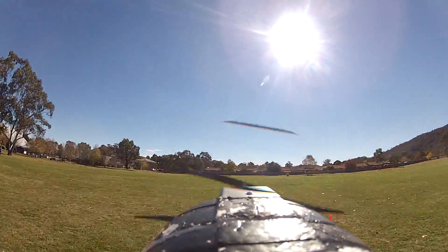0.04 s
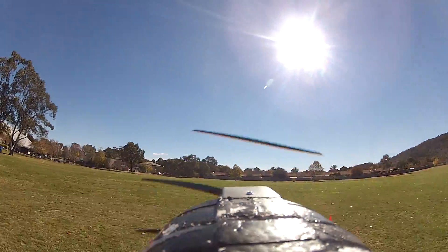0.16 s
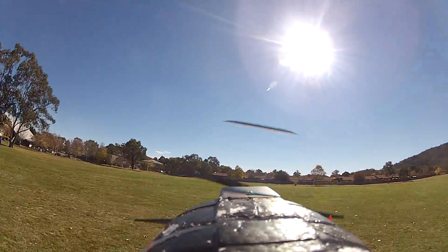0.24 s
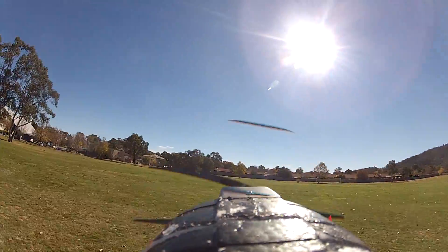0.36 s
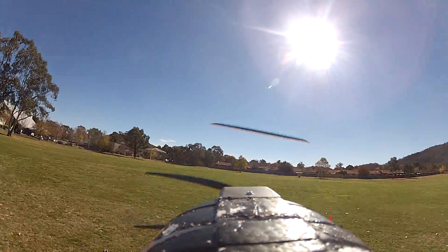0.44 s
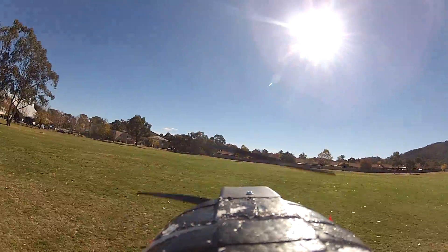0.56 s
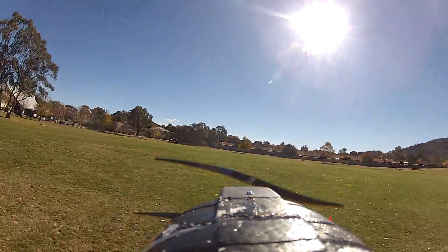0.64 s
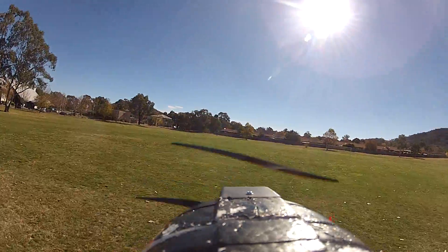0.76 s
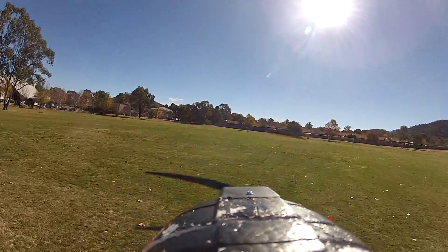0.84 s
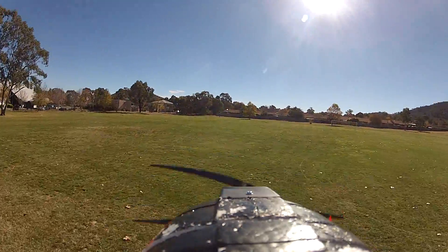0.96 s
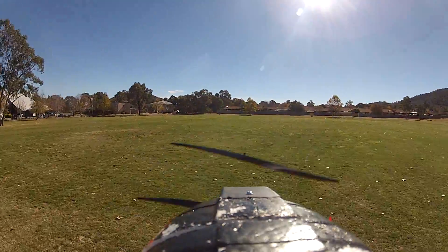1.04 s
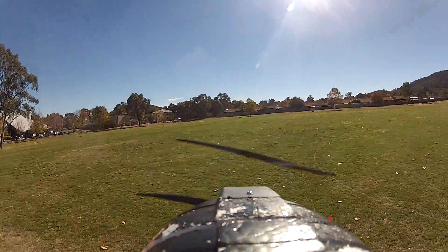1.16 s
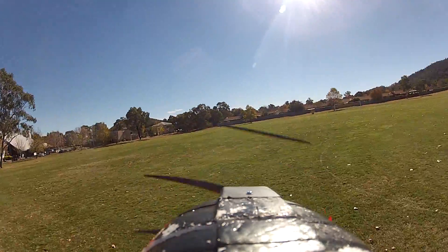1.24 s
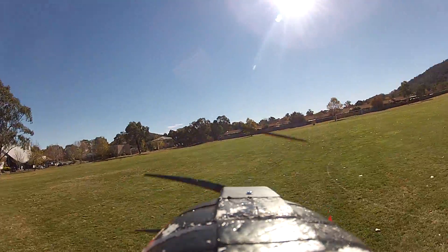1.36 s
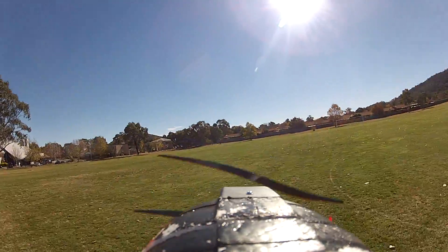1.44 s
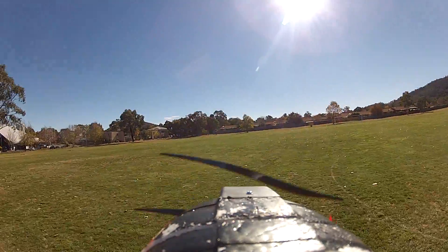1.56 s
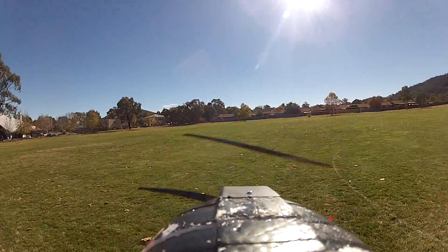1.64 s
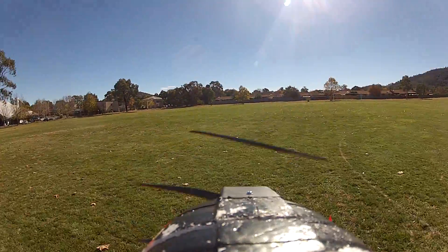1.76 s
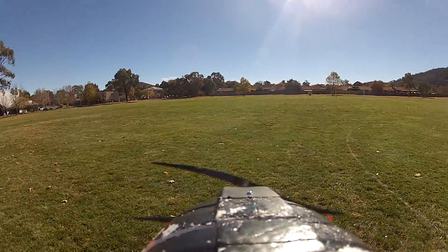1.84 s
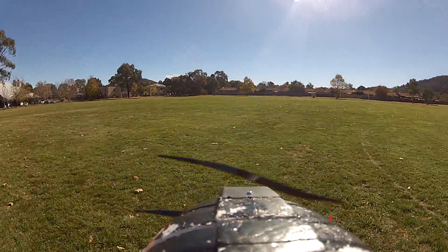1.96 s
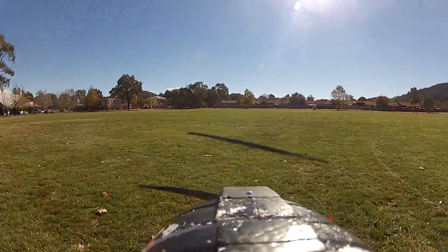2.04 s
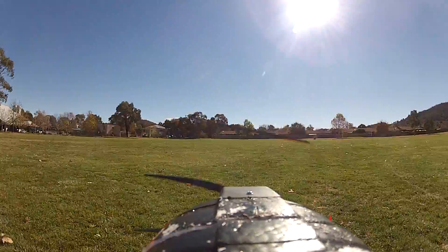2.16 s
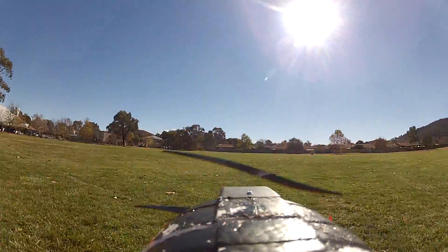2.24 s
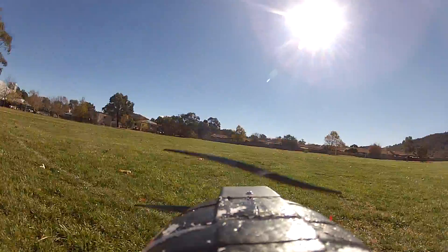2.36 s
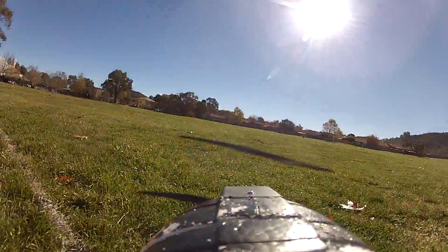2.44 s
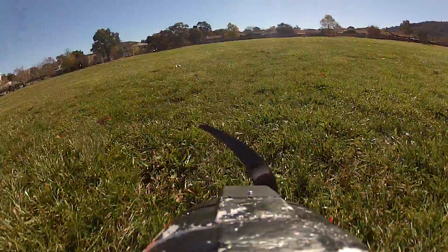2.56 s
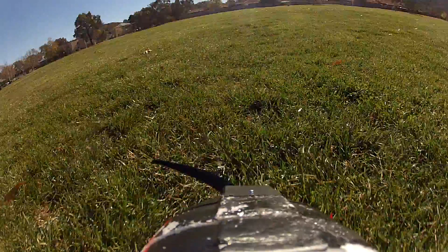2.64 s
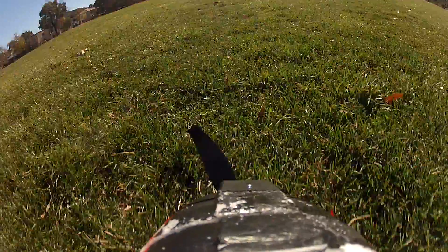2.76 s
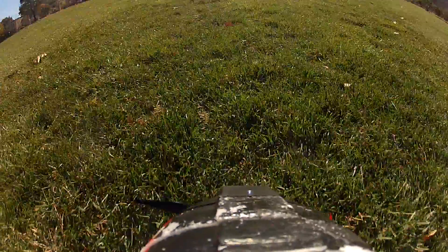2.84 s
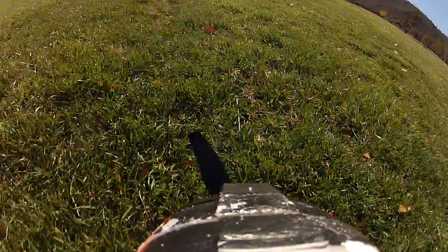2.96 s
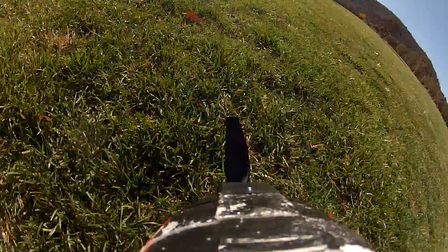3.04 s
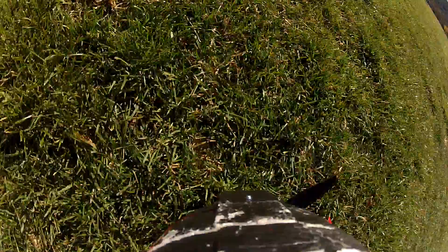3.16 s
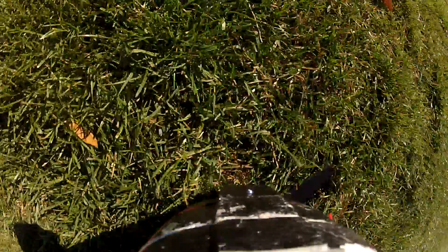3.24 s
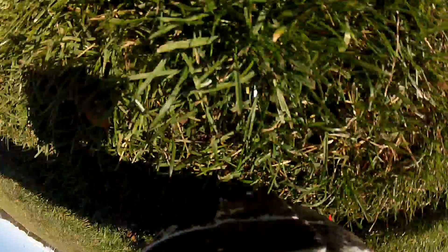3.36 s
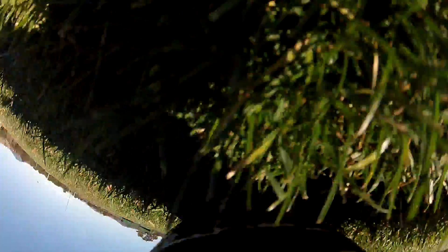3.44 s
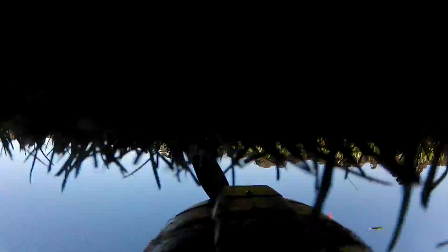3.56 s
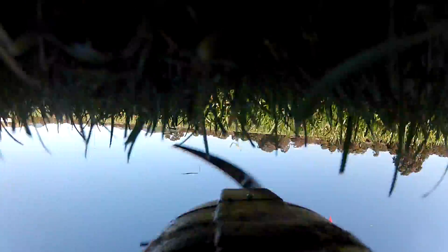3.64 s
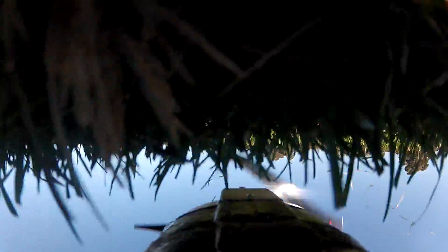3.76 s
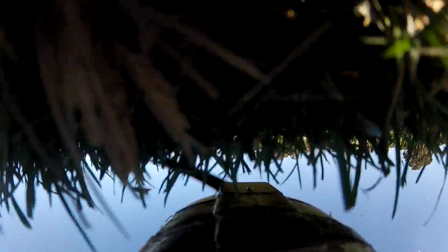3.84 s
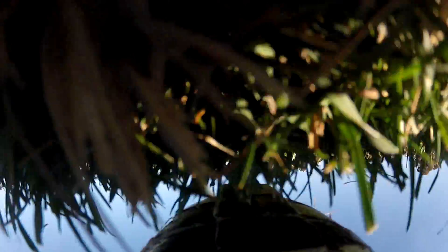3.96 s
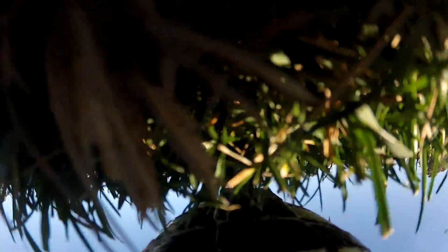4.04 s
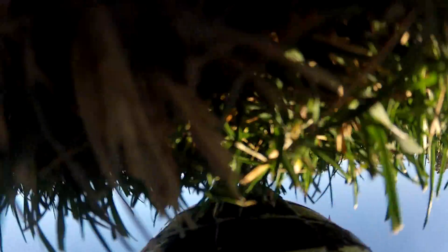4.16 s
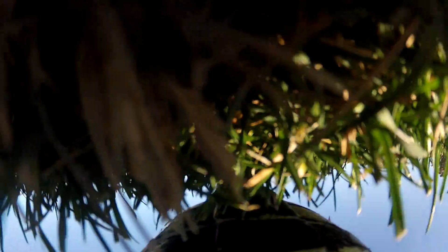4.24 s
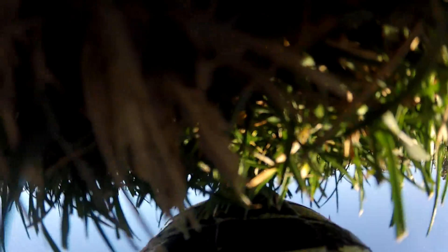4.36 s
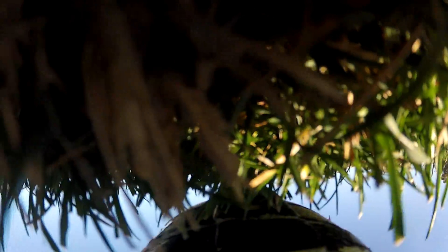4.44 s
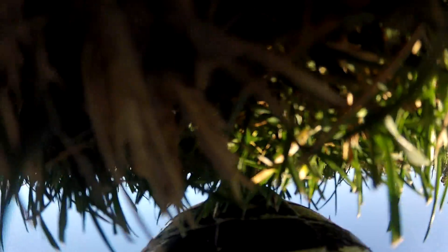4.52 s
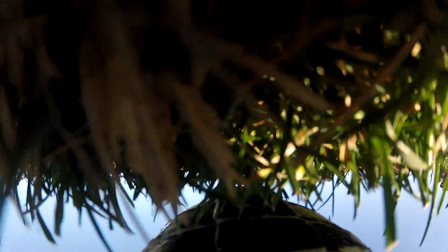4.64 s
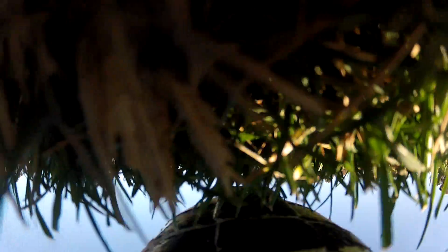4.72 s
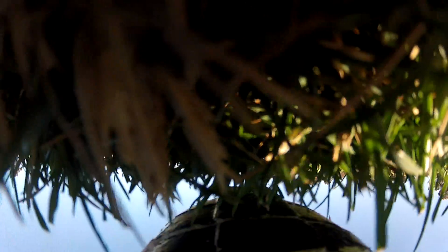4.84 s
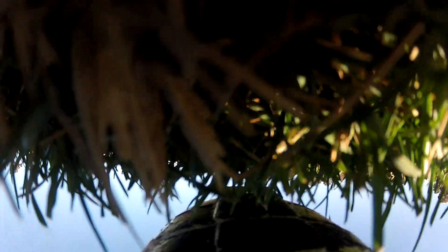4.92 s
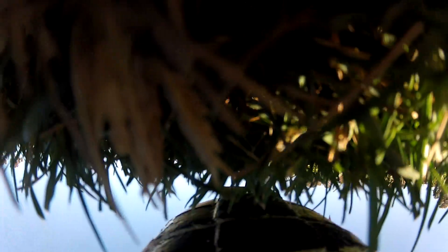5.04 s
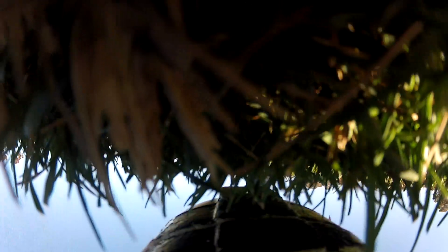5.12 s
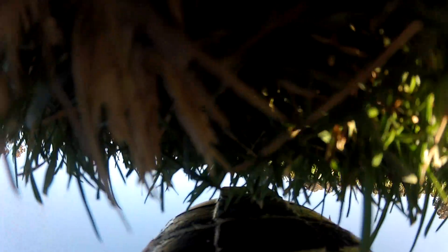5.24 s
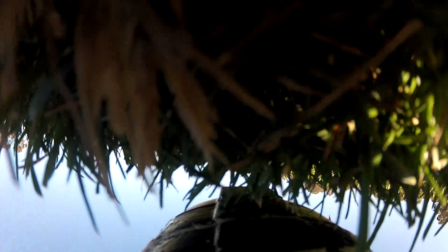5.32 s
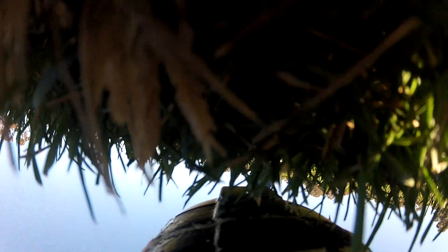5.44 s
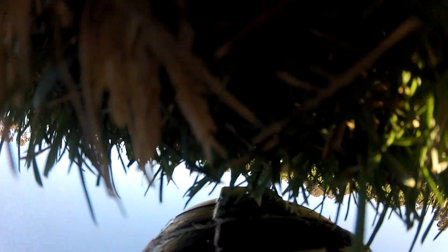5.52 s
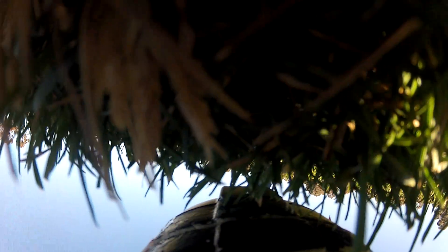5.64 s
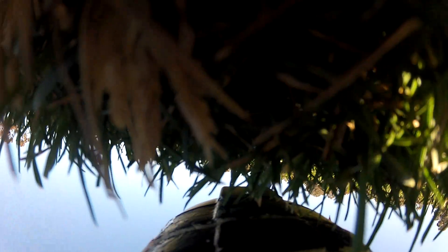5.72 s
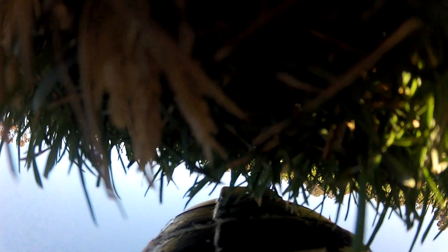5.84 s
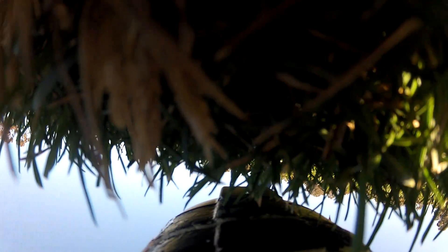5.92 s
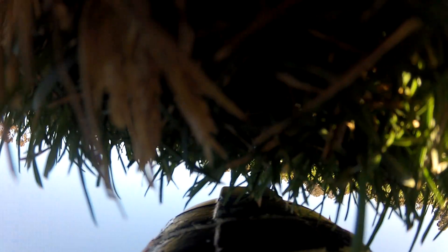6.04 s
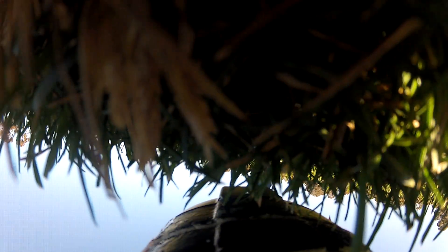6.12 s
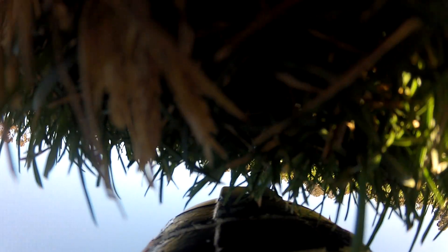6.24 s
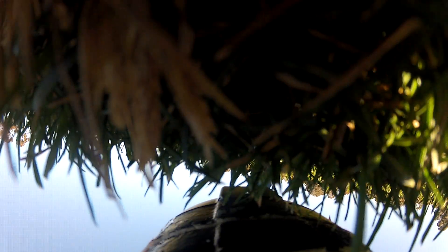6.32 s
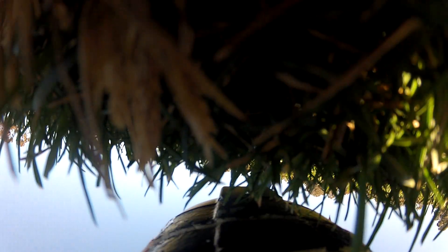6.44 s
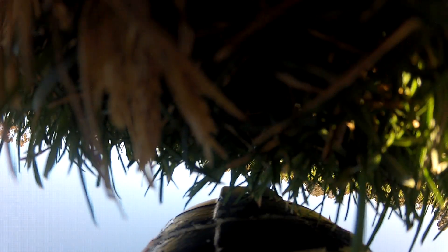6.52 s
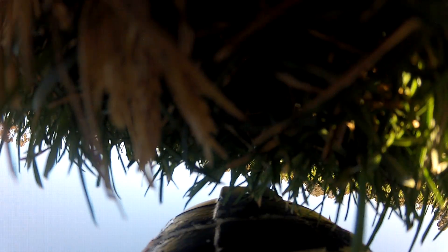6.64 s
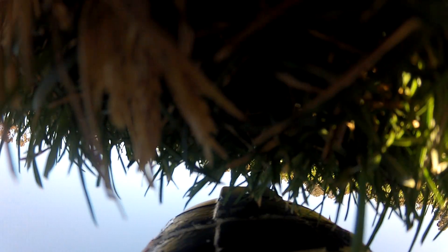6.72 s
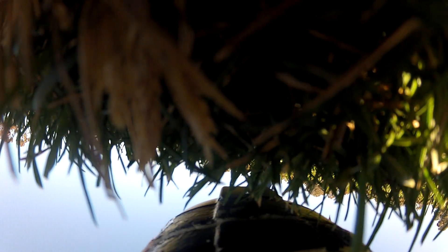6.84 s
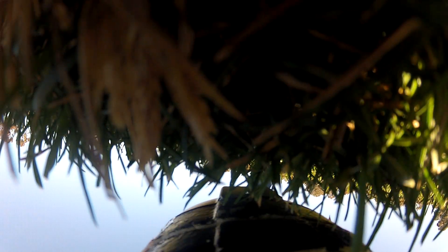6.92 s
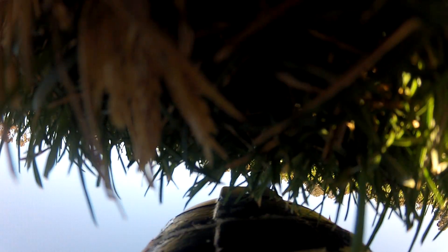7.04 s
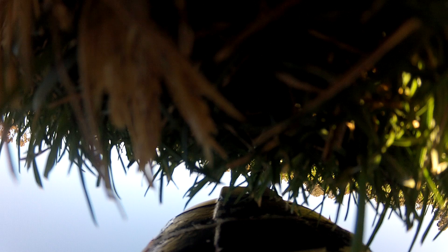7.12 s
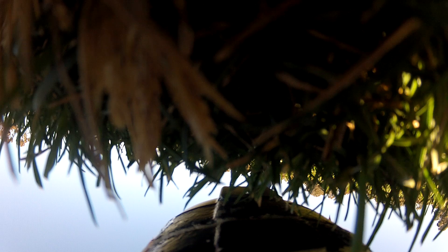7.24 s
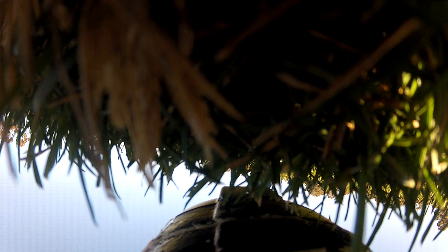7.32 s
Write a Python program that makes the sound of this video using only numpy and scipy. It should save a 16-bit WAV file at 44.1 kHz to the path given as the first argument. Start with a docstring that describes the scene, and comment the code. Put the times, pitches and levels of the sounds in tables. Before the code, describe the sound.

A small electric model plane hums and whines through buffeting wind, then crashes into grass with hard knocks, scrapes and tumbling thuds, leaving faint rustles.

```python
"""A small electric model plane flies with a camera aboard: shaft orders hum, motor and bearing tones ring the foam
airframe and noise in moving bands makes the wind. The whine dies as the propeller meets the grass; then knocks and
thuds strike resonant bodies while grains of noise drag, tumble and scrape the plane along. It settles under rustling
and ticks of the camera case, leaving a breeze that blows throughout. The camera samples slowly and holds each sample,
so everything is mirrored into the treble."""
import sys
import numpy as np
from scipy import signal
from scipy.fft import rfft, irfft
from scipy.io import wavfile
from scipy.ndimage import uniform_filter1d

SR = 44100
rng = np.random.default_rng(int(sys.argv[2]) if len(sys.argv) > 2 else 0)


def digitize_waveform(pressure):
    """Quantize a signal to 16-bit integers and store it at the path in sys.argv[1].

    Rows of a 2-D input are taken as channels; values are limited to [-1, 1].
    """
    field = np.atleast_2d(pressure).T
    bounded = np.clip(field, -1, 1)
    quanta = np.round(bounded * 32767).astype(np.int16)
    wavfile.write(sys.argv[1], SR, quanta)


N = 325458
T = np.arange(N) / SR  # time in s

# Flight levels: time_s, hum_db, wind_db
FLIGHT_LEVELS = [(0.0, -18.5, -11.5), (0.15, -9, -12), (0.53, -10.5, -13), (1.01, -17, -16.5),
                 (1.61, -11.5, -12.5), (2.0, -13.5, -13.5), (2.2, -7, -13.5), (2.31, -25, -11),
                 (2.56, -37, -10.5)]
# Shaft speed: time_s, speed_hz
SHAFT_SPEED = [(0.0, 134.7), (0.12, 133.0), (0.24, 130.2), (0.36, 125.9), (0.6, 121.9), (0.84, 118.6),
               (1.08, 117.6), (1.38, 116.8), (1.68, 117.0), (2.16, 118.6), (2.4, 117.3), (2.55, 114.8)]
# Hum of the unbalanced shaft: shaft_multiple, level_db
HUM_ORDERS = [(1, -0.5), (2, -9.5), (3, -20.5), (4, -28), (5, -27.5)]
# Motor tones locked to the shaft: shaft_multiple, level_db
MAGNET_TONES = [(7, -7), (8, -24), (21, -22)]
# Bearing tones: ball_pass_multiple, level_db
BEARING_TONES = [(4, -12), (5, -1.5), (6, -19.5), (8, -8.5), (9, -7), (10, -8.5), (11, -7.5), (12, -8),
                 (13, -11)]
# Extra gain of the first bearing tone, the fourth multiple of ball pass: time_s, gain_db
FOURTH_BEARING_GAIN = [(0.0, 8), (0.53, 0), (1.01, 14), (1.65, 14), (2.0, -2), (2.19, 15.5), (2.45, 10)]
# Other motor tones: shaft_multiple
SIDE_ORDERS = [10.49, 10.74, 13.11, 13.42, 13.71, 14.37, 14.78]
# Their levels, in the same order: level_db
SIDE_LEVELS = [-10.5, -6.5, -13, -4, -9.5, -6.5, -4]
# Resonances the running motor shakes: centre_hz
SHAKEN_CENTRES = [830, 1140, 1270, 1590, 1700, 1830, 2040, 2280, 2550, 2870, 3130, 3470, 3750, 4100]
# Their shape, in the same order: width_hz (of one filter pass), level_db
SHAKEN_MODES = [(352, -3.5), (170, -13.5), (163, 1.5), (178.6, -0.5), (121, -2.5), (122, -5), (300, -15),
                (230.6, -10.5), (530, -19), (223, -8.5), (250, -13.5), (118, -2.5), (121.7, -10),
                (148, -48)]
# Spectrum of wind on the microphone, relative: frequency_hz, density_db (per Hz)
WIND_SPECTRUM = [(12, -58), (20, -7.5), (65, -2.5), (119, 3.5), (527, -11), (743, -17), (823, -28),
                 (1050, -23), (1200, -38), (1560, -35), (2640, -120)]
# Slide over the grass: time_s, airframe_drag_db, case_stalks_db
SLIDE_LEVELS = [(2.556, -19, -35.5), (2.66, -21.5, -36), (2.7, -19, -44), (2.74, -14.5, -31),
                (2.83, -16, -33), (2.92, -15, -35.5), (2.99, -15, -32), (3.04, -19, -33),
                (3.16, -18.5, -38.5), (3.2, -19, -34), (3.44, -24, -40), (3.522, -13, -32.5),
                (3.6, -23.5, -25.5), (3.624, -26, -38.5), (3.706, -18, -25), (3.862, -18.5, -36),
                (4.0, -18, -43), (4.06, -18.5, -51), (4.222, -45.5, -57), (4.3, -56, -71)]
# A part digs into the grass: start_s, length_s, level_db, part
SCRAPES = [(2.737, 0.13, -21, "belly"), (2.879, 0.037, -26.5, "wing"), (2.952, 0.041, -30, "wing"),
           (3.028, 0.13, -24.5, "belly"), (3.318, 0.017, -19, "wing"), (3.363, .012, -18.5, "wing"),
           (3.364, 0.033, -17.5, "belly"), (3.489, 0.046, -22.5, "belly"), (3.578, 0.033, -17.5, "belly"),
           (3.658, .06, -20, "belly"), (3.661, .2, -32.5, "lid"), (3.92, 0.092, -37, "lid"),
           (3.977, .11, -26.5, "belly"), (3.754, 0.107, -32, "tail"), (3.856, 0.12, -28.5, "tail")]
# Rattle of the case as the plane flips over: time_s, level_db
FLIP_RATTLE = [(3.545, -36), (3.562, -15.5), (3.585, -16.5), (3.602, -12)]
# Stalks springing back against the case: time_s, level_db
RUSTLE_LEVELS = [(4.05, -55), (4.13, -42), (4.602, -50), (4.846, -48.5), (5.338, -46), (5.47, -41.5),
                 (5.618, -51.5), (5.856, -71.5), (6.0, -73)]
# Foam airframe resonances: centre_hz, width_hz, level_db
AIRFRAME = [(54.7, 43, -9.5), (142, 82, -4), (292, 107, -4), (380, 59, 1.5), (611, 95, 0.5),
            (840, 810, -14.5)]
# Panel resonances, wing then tail: centre_hz, width_hz, level_db
PANELS = [(1204, 270, 13.5), (1652, 197, -9)]
# Camera case resonances: centre_hz, width_hz, level_db
CASE = [(1200, 230, 3.5), (1840, 160, -1), (2431, 270, 4), (2930, 230, 6.5), (3700, 450, 1.5),
        (4970, 990, -4.5)]
# Hard blows: start_s, case_peak_db, panel_peak_db, pitch_hz
KNOCKS = [(2.5505, 1.5, 0, 2130), (2.595, -19.5, -25, 2950), (2.7549, -17, -11, 2390),
          (2.811, -14.5, -12, 2970), (2.8742, -32, -10, 1810), (2.899, -13.5, -32, 2000),
          (2.9886, -20, -22, 2850), (3.03, -14.5, -20, 3100), (3.043, -14, -18, 3100),
          (3.0613, -14, -31, 1840), (3.1561, 2, -13, 2600), (3.1797, -7, -5.5, 2110),
          (3.318, -42, -8, 1840), (3.366, -7.5, -15, 2820), (3.3725, -19, -1.5, 1810),
          (3.4237, -32, -13.5, 1910), (3.452, -32, -12.5, 1810), (3.483, -38, -11, 2030),
          (3.511, -36, -9, 2130), (3.5985, 2, -7, 3040), (3.626, -16.5, -21, 2760),
          (3.6543, -14, -16, 2780), (3.717, -12, -7.5, 2890), (3.755, -18, -14, 2910),
          (3.7754, -6, -15, 2710), (3.8452, -16, -30, 2920), (4.144, -22, -24, 2880)]
# Soft blows: start_s, peak_db, pitch_hz
THUDS = [(2.523, 1.5, 204), (2.546, -0.5, 362), (2.74, -8, 276), (2.863, -11.5, 606), (2.916, -6, 594),
         (2.929, -8, 610), (2.993, -4.5, 595), (3.318, -6, 610), (3.327, -6, 600), (3.37, -6, 142),
         (3.506, -10, 320), (3.526, -3.5, 393), (3.538, -8, 380), (3.599, -10, 206), (3.707, -7.5, 590),
         (3.719, -10, 610), (3.808, -6.5, 388), (3.923, -7, 700), (3.96, -4.5, 676), (3.985, -2.5, 495),
         (4.007, -3, 498), (4.041, -5.5, 484)]
# Stalks flicking the case: start_s, peak_db, pitch_hz
TICKS = [(4.181, -24, 2930), (4.1999, -31, 2880), (4.2223, -30, 2990), (4.2507, -29, 2930),
         (4.2922, -14.5, 2570), (4.344, -32, 2910), (4.4075, -27, 2510), (4.4258, -26, 3750),
         (4.4524, -25, 3670), (4.5206, -31, 3780), (4.5315, -24, 3040), (4.581, -28, 2620),
         (4.6117, -30, 2970), (4.7077, -21.5, 2860), (4.8239, -35.5, 2960), (4.8915, -26.5, 2970),
         (4.9606, -31, 2960), (5.037, -25, 3010), (5.0749, -25.5, 2970), (5.1314, -29, 2940),
         (5.1502, -17.5, 2400), (5.1816, -23.5, 2860), (5.2576, -31, 2380), (5.2814, -26.5, 2990),
         (5.342, -28, 2930), (5.3667, -28, 2650), (5.5179, -25, 2870), (5.5603, -16, 2880),
         (5.5743, -16, 2900), (5.6114, -31, 2820), (5.8717, -34, 2940), (5.9299, -46, 2910),
         (6.064, -39, 2810), (6.317, -51, 2920), (6.354, -35, 2830), (6.5036, -49.5, 2810),
         (6.7002, -43.5, 2940), (6.73, -40, 3700), (6.9232, -46, 2900), (7.1402, -53, 2730),
         (7.17, -39, 1890)]
# Spectrum of the breeze, relative: frequency_hz, density_db (per Hz)
BREEZE_SPECTRUM = [(12, -50.5), (20, -13), (103, -0.5), (196, -5), (392, -13.5), (601, -11.5), (944, -24.5),
                   (1060, -32.5), (1480, -39), (2570, -43.5), (2820, -36.5), (3500, -46.5), (4880, -45),
                   (5900, -62.5), (7670, -99), (13000, -120)]

BALL_PASS = 2.429  # balls that pass a rough spot on the race in one shaft turn
WHINE_DB, TONES_DB, SHAKEN_DB, HISS_DB = -17.5, -1, -4.5, -21.5  # the last three sit inside the whine
STRIKE_S, STALL_DB_PER_S = 2.515, -330  # the motor stalls when the propeller meets the grass
BELLY_DB, WING_DB, TAIL_DB, LID_DB = -13.5, -16.5, -21, -28  # each part under the drag while off the ground
DIG_S = 0.008  # rise and fall of a scrape
CONTACT_S = 0.006  # length of a hard blow
FAINT_START_S, FAINT_END_S, FAINT_COUNT = 4.18, 5.66, 14  # fainter ticks while the grass settles
FAINT_DB, FAINT_SPREAD_DB, FAINT_HZ = -33, 5, 2920  # middle peak, spread either way, pitch
BREEZE_DB = -40
CAMERA_HZ, HOLD, TOP_HZ = 12000, 4, 15600  # sampling rate, repeats of each sample, top of the band


def flight():
    """Propeller drive and wind: hum and whine share one wavering shaft phase."""
    (hum_db, wind_db), gate = curves(FLIGHT_LEVELS)
    whine_db = WHINE_DB + STALL_DB_PER_S * np.maximum(T - STRIKE_S, 0)
    speed_hz = curve(SHAFT_SPEED) * (1 + 0.001 * walk(39.66))
    turn = 2 * np.pi * np.cumsum(speed_hz) / SR
    hum = -undb(hum_db) * unit(shaft_hum(turn))
    whine = undb(whine_db) * motor_whine(turn)
    wind = undb(wind_db) * air(WIND_SPECTRUM, gust_db=1.0, flicker_db=1.76, rate=12.67)
    return gate * (hum + whine + wind)


def shaft_hum(turn):
    """An unbalanced shaft pushes at multiples of its speed."""
    sway = walk(29.97)
    # gusts load the blades unevenly, so the hum flutters
    flutter = undb(2.2 * walk(45))
    return flutter * sum(undb(db) * np.cos(k * (turn + 0.25 * sway)) for k, db in HUM_ORDERS)


def motor_whine(turn):
    """Motor and bearing tones plus vibration noise, ringing what the motor shakes."""
    body = [(hz, *mode) for hz, mode in zip(SHAKEN_CENTRES, SHAKEN_MODES)]
    magnets = sum(undb(db + 0.88 * walk(56)) * np.sin(k * turn) for k, db in MAGNET_TONES)
    # the balls slip a little, so their tones flutter
    balls = [undb(db + 2.4 * walk(17)) * np.sin(k * (BALL_PASS * turn + 0.18 * walk(30)))
             for k, db in BEARING_TONES]
    balls[0] *= undb(curve(FOURTH_BEARING_GAIN))
    sides = sum(undb(db + 2.0 * walk(25.1)) * np.sin(k * (turn + 0.033 * walk(40.05)))
                for k, db in zip(SIDE_ORDERS, SIDE_LEVELS))
    # a tone swells while it crosses a resonance
    tones = magnets + ring(sum(balls) + sides, body, order=2)
    # the shaking throbs once a turn
    throb = 1 + 0.12 * np.cos(turn)
    shaking = throb * undb(1.56 * walk(59.6)) * rng.standard_normal(N)
    vibration = unit(ring(shaking, body, order=2))
    propeller_hiss = unit(ring(shaking, [(4130, 1730, 0)], order=2))
    return undb(TONES_DB) * tones + undb(SHAKEN_DB) * vibration + undb(HISS_DB) * propeller_hiss


def slide():
    """Tufts drag under the airframe and stalks whip the case, then spring back as the plane settles."""
    (drag_db, stalks_db), sliding = curves(SLIDE_LEVELS)
    (rustle_db,), settling = curves(RUSTLE_LEVELS)
    (crunch_db,), flipping = curves(FLIP_RATTLE)
    stalks = brushing(per_s=390, brush_s=0.002, bunch_db=2.0, bed=0.047)
    rustle = brushing(per_s=540, brush_s=0.0014, bunch_db=2.0, bed=0.062)
    crunch = unit(ring(grains(1499, 0.97, 0.5), CASE))
    out = sliding * (dragging(drag_db) + undb(stalks_db) * stalks)
    out += settling * undb(rustle_db) * rustle
    return out + flipping * undb(crunch_db) * crunch


def dragging(drag_db):
    """Uneven grains of grass ring the airframe, wing, tail and lid; parts that dig in get louder."""
    tufts = undb(1.2 * walk(50))
    rumble = unit(tufts * ring(grains(600, 3.6, 1.1), AIRFRAME[2:]))
    belly = unit(tufts * ring(grains(600, 3.6, 1.1), AIRFRAME[:2]))
    wing = unit(tufts * ring(grains(600, 2.6, 1.0), PANELS[:1]))
    tail = unit(tufts * ring(grains(600, 2.6, 1.0), PANELS[1:], order=2))
    # the lid of the case buzzes in one narrow mode
    lid = unit(ring(grains(150, 3.6, 0.3), CASE[3:4], order=2))
    out = undb(drag_db) * rumble
    out += digging("belly", drag_db + BELLY_DB) * belly
    out += digging("wing", drag_db + WING_DB) * wing
    out += digging("tail", drag_db + TAIL_DB) * tail
    return out + digging("lid", drag_db + LID_DB) * lid


def digging(part, rest_db):
    """Gain of one part: its share of the drag, raised while it scrapes."""
    gain = undb(rest_db)
    for start_s, length_s, db, name in SCRAPES:
        if name == part:
            inside_s = np.minimum(T - start_s, start_s + length_s - T)
            gain = gain + undb(db) * np.clip(inside_s / DIG_S + 0.5, 0, 1)
    return gain


def brushing(per_s, brush_s, bunch_db, bed):
    """Each stalk brushes the case with decaying noise; the level wavers as stalks come in bunches."""
    touch = signal.lfilter([1], [1, -np.exp(-1 / (brush_s * SR))], abs(grains(per_s, 3.0, bed)))
    return unit(undb(bunch_db * walk(35)) * ring(touch * rng.standard_normal(N), CASE))


def knocks():
    """Hard blows: a short rattle of noise rings case and panels, with an extra mode at the listed pitch."""
    out, t = np.zeros(N), T[:2048]
    envelope = np.sin(np.pi * np.clip(t / CONTACT_S, 0, 1) ** 0.39)
    for start_s, case_db, panel_db, hz in KNOCKS:
        push = rng.standard_normal(len(t)) * envelope
        case = ring(push, struck_case(3.0)) + 0.6 * band(push, hz, 300.0)
        add(out, start_s, case_db, case)
        add(out, start_s, panel_db, ring(push, PANELS))
    return out


def thuds():
    """Soft blows through the foam: a damped swing at the pitch of the part that lands rings the airframe."""
    out, t = np.zeros(N), T[:4096]
    foam = signal.butter(2, 1200, fs=SR)
    for start_s, db, hz in THUDS:
        swing = np.cos(2 * np.pi * hz * t) * np.exp(-t * hz / 1.6)
        push = signal.lfilter(*foam, swing)
        add(out, start_s, db, push + 1.18 * ring(push, AIRFRAME))
    return out


def ticks():
    """Single stalks flick the case: dulled noise bursts ring it, with an extra mode at the listed pitch."""
    out, t = np.zeros(N), T[:1024]
    dull = signal.butter(1, 3500, fs=SR)
    envelope = np.exp(-t / 0.0012) * np.minimum(t / 0.00028, 1)
    # fainter flicks fall at random
    faint = [(rng.uniform(FAINT_START_S, FAINT_END_S), FAINT_DB + FAINT_SPREAD_DB * rng.uniform(-1, 1), FAINT_HZ)
             for _ in range(FAINT_COUNT)]
    for start_s, db, hz in list(TICKS) + faint:
        push = signal.lfilter(*dull, rng.standard_normal(len(t)) * envelope)
        add(out, start_s, db, ring(push, struck_case(2.5)) + 0.45 * band(push, hz, 350.0))
    return out


def struck_case(spread_db):
    """The case modes above the lowest, with random levels as if struck at a random spot."""
    return [(hz, width, db + spread_db * rng.standard_normal()) for hz, width, db in CASE[1:]]


def field():
    """Breeze over the grass; it also sings faintly in the case."""
    breeze = air(BREEZE_SPECTRUM, gust_db=0.33, flicker_db=0.43, rate=8)
    sung = undb(3.01 * walk(20)) * ring(rng.standard_normal(N), [(2800, 220, 0)], order=2)
    return undb(BREEZE_DB) * (breeze + undb(-36) * unit(sung))


def air(spectrum, gust_db, flicker_db, rate):
    """Turbulence: noise in half-octave bands that swell together and flicker alone."""
    hz, db = np.transpose(spectrum)
    f = np.arange(N // 2 + 1) * SR / N + 1e-3  # keeps the logarithm finite
    shaped = rfft(rng.standard_normal(N)) * undb(np.interp(np.log(f), np.log(hz), db, right=-120))
    place = 2 * np.log2(np.maximum(f, 20) / 20)  # half octaves above 20 Hz
    gust = walk(rate / 4)
    out = 0
    for k in range(int(2 * np.log2(hz[-1] / 20)) + 2):
        one_band = irfft(shaped * np.maximum(1 - abs(place - k), 0), N)
        out = out + undb(gust_db * gust + flicker_db * walk(rate)) * one_band
    return unit(out)


def grains(per_s, spread_db, bed):
    """Friction: random clicks of very uneven size over a smooth bed of noise."""
    hit = rng.random(N) < per_s / SR
    size = np.minimum(rng.exponential(size=N), 4)
    clicks = hit * rng.standard_normal(N) * undb(spread_db * size)
    return unit(clicks) + bed * rng.standard_normal(N)


def ring(x, modes, order=1):
    """A body with several resonances of alternating sign; order 2 gives steep skirts."""
    out = 0
    for k, (hz, width, db) in enumerate(modes):
        once = band(x, hz, width)
        out = out + (-1) ** k * undb(db) * (once if order == 1 else band(once, hz, width))
    return out


def band(x, hz, width):
    """One resonance, gain 1 at the centre."""
    return signal.lfilter(*signal.iirpeak(hz, hz / width, SR), x)


def walk(rate):
    """Random levels held 1 / rate s and slewed twice; spread near 1."""
    k = int(SR / rate)
    held = np.repeat(rng.standard_normal(N // k + 1), k)
    return 1.3 * uniform_filter1d(uniform_filter1d(held, k), k)[:N]


def curve(table):
    """A level or speed joined by straight lines between (time_s, value) points."""
    return np.interp(T, *np.transpose(table))


def curves(table):
    """Columns joined by straight lines, and a soft-edged gate that is open while the table lasts."""
    s, *columns = np.transpose(table)
    gate = uniform_filter1d(1.0 * (T <= s[-1]) * (T >= s[0]), size=64, mode="nearest")
    return [np.interp(T, s, c) for c in columns], gate


def add(out, start_s, db, x):
    """Adds a short sound with the given peak."""
    i = int(start_s * SR)
    out[i:i + len(x)] += (undb(db) * x / abs(x).max())[:N - i]


def undb(db):
    """Decibels to amplitude."""
    return 10 ** (np.asarray(db) / 20)


def unit(x):
    """Scales to an RMS of 1."""
    return x / np.sqrt(np.mean(x ** 2))


def scene():
    """The flight, the landing and the field in one channel."""
    return (flight() + slide() + knocks() + thuds() + ticks() + field())[None]


def record(dry):
    """Limits peaks, samples slowly, holds every sample (which mirrors the spectrum) and cuts the top."""
    low_pass = signal.butter(4, 5300, fs=SR, output="sos")
    soft = signal.sosfilt(low_pass, np.clip(dry, -1, 1))
    slow = signal.resample_poly(soft, CAMERA_HZ, SR, axis=1)
    held = signal.resample_poly(np.repeat(slow, HOLD, axis=1), SR, HOLD * CAMERA_HZ, axis=1)
    held = np.pad(held, ((0, 0), (0, HOLD)))[:, :N]
    return signal.sosfilt(signal.ellip(10, 0.2, 70, TOP_HZ, fs=SR, output="sos"), held)


dry = scene()
out = record(dry)
digitize_waveform(out)
```